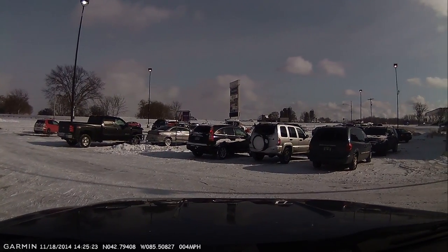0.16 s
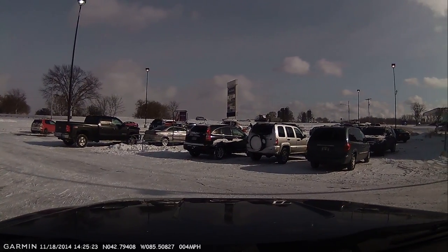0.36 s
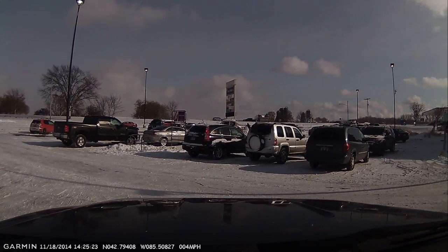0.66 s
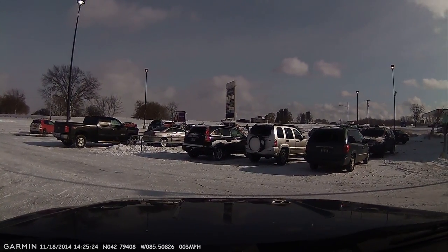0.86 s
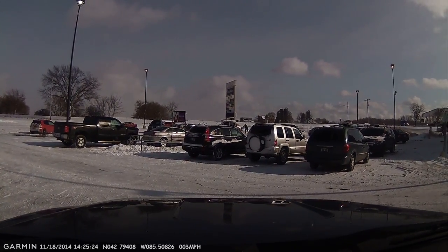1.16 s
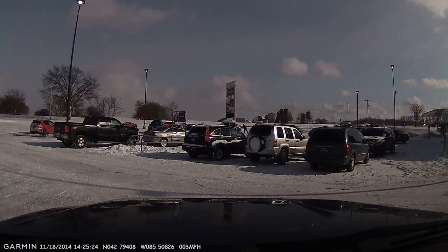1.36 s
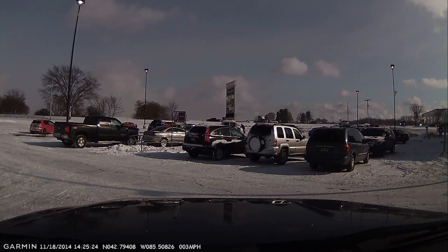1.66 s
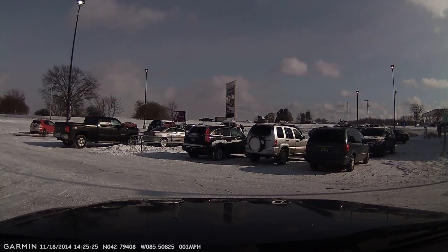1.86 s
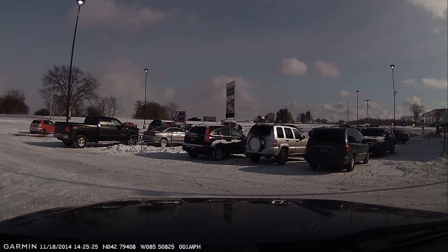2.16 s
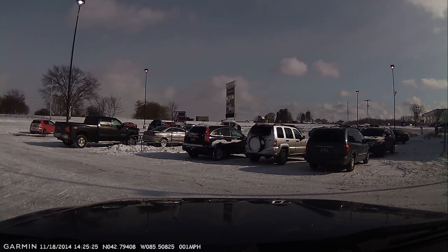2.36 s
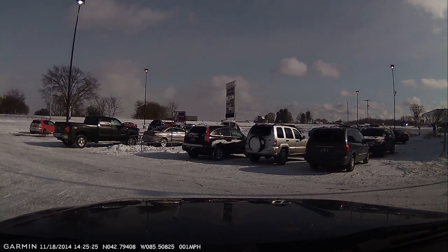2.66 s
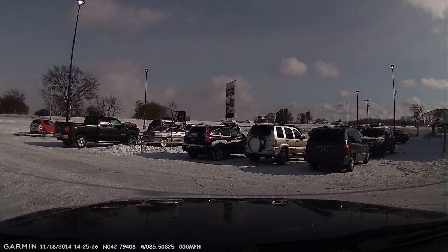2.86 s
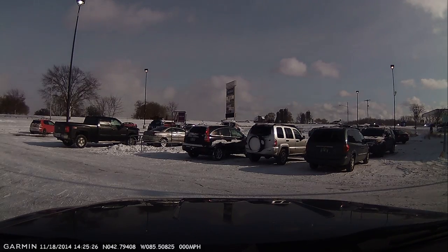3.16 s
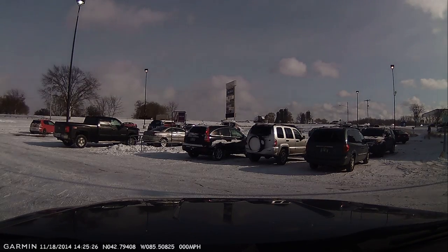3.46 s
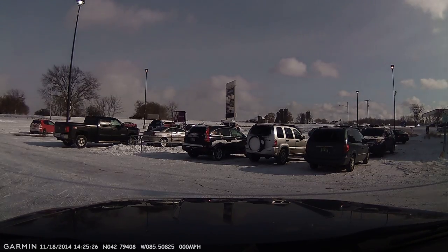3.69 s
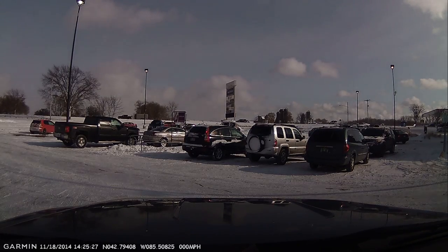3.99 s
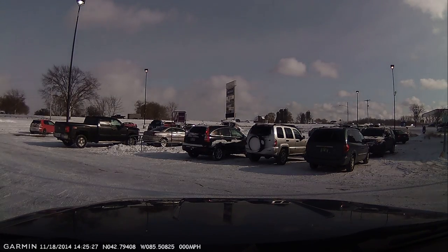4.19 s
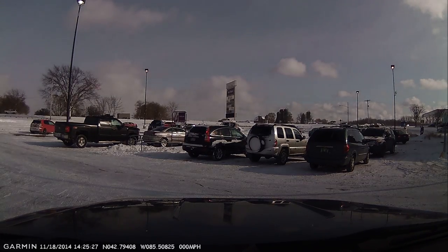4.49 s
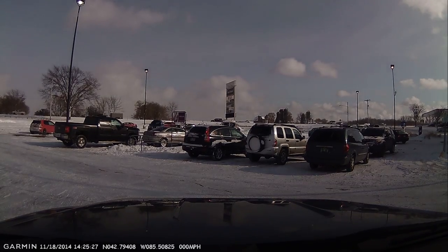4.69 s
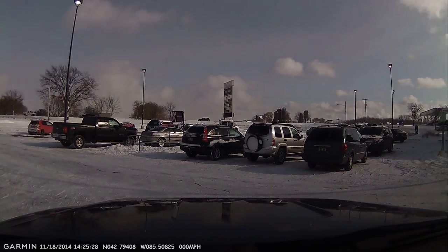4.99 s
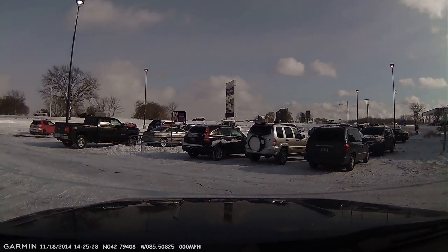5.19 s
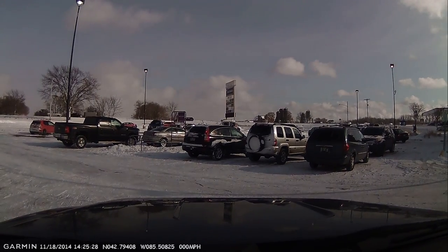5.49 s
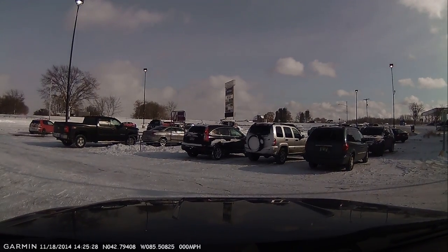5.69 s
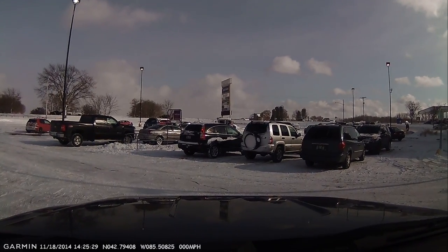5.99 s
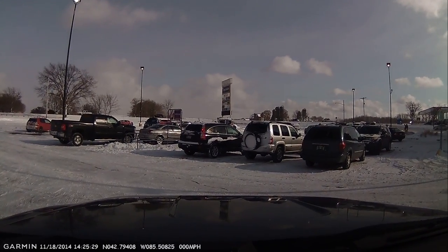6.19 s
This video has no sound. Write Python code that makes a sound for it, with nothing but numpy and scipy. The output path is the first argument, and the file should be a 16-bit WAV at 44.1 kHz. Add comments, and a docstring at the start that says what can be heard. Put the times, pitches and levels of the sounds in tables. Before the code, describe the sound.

Inside a slow car on packed snow, heard close at the windscreen: a low, uneven engine throb, a faint wavering pump whine, cabin drone, soft tyre rumble and thin hiss. A dull faint knock comes at 0.25 s. From 1.0 to 1.9 s there are grainy scuffs and a run of gear lever clunks; near 1.6 s the engine flares slightly, then gradually settles, and at 1.77 and 1.84 s deep boomy clunks carry sharp latch clicks and a short metallic buzz. Scuffs return at 2.3 to 2.75 s. Cloth rustles, the engine dips near 3 s, and the car stands by 3.3 s. Strong double knocks with plastic rattle land at 3.2 and 3.75 s, lighter ones between and at 4.1 s. Faint finger rubbing follows from 4.35 s, with bright button clicks at 4.91 to 5.14 s, a faint tap at 5.6 s and a last click at 5.97 s over a slightly quieter idle.

```python
"""Inside a car that rolls to a stop in a snowy lot and idles, heard from a camera on the windscreen.
At first: engine orders, a wavering pump whine, shaped noise for tyres, cabin and hiss, faint cloth noise,
and a knock on the dashboard made of ringing modes. From 1 s grainy scuffs, clunks of the gear lever, latch
clicks and a buzzing catch; the engine runs free and flares. The car stands at 3.3 s, amid more rustles and
modal knocks; from 4.3 s friction noise in case resonances is a rubbing finger, with button clicks around it."""
import sys
import numpy as np
from scipy import signal
from scipy.fft import rfft, irfft, next_fast_len
from scipy.io import wavfile

SR = 44100
rng = np.random.default_rng(int(sys.argv[2]) if len(sys.argv) > 2 else 0)


def generate_wav(signal):
    """Clip the signal to [-1, 1] and save it as 16-bit WAV at the path in sys.argv[1]."""
    frames = np.transpose(np.atleast_2d(signal))
    scaled = np.clip(frames, -1, 1) * 32767
    pcm = np.round(scaled).astype(np.int16)
    wavfile.write(sys.argv[1], SR, pcm)


N = 279594
TIME = np.arange(N) / SR
HIT_TIME = np.arange(SR // 3) / SR

# Partials of the engine note. Each row: multiple of the firing rate, relative level in dB.
ENGINE_ORDERS = [(1, -0.5), (1.75, -3.5), (2, -14), (3, -16), (4.75, -21)]
# The engine note swells and softens. Each row: centre in seconds, change in dB, half width in seconds.
ENGINE_SURGES = [(.25, 3, 0.13), (.85, -5, 0.25), (2.98, -11, 0.15)]
# Tyre spectrum. Each row: frequency in Hz, relative density in dB per Hz.
TYRE_SPECTRUM = [(5, -68), (18, 6.5), (33, 0), (48, -45), (100, -6), (400, -99)]
# The car rocks on its springs. Each row: peak in seconds, level in dB, half width in seconds.
SWAYS = [(.1, -49, 0.58), (.85, -39, 0.14), (1.8, -37, 0.18), (2.75, -50, 0.22), (3.9, -34.5, 0.11),
         (4.17, -31, 0.054)]
# Engine and fan through the cabin. Each row: frequency in Hz, relative density in dB per Hz.
CABIN_SPECTRUM = [(10, -7.5), (52, -5.5), (72, -0.5), (115, -8), (138, -9.5), (195, -14.5), (255, -16),
                  (420, -24), (540, -22.5), (720, -29.5), (1200, -38), (3000, -46.5), (16000, -78)]
# Microphone hiss. Each row: frequency in Hz, relative density in dB per Hz.
HISS_SPECTRUM = [(100, 13), (2000, 0), (6000, -1), (12000, -1), (16000, -1.5)]
# Strokes of a sleeve over the seat. Each row: peak in seconds, level in dB, half width in seconds,
# brightness in dB (added to the treble, taken from the rest), centre of the swish in Hz.
SLEEVE_STROKES = [(1.2, -63.5, 1, 0, 1490), (2.16, -54.5, 0.1, 7.5, 1840), (2.92, -61.5, 0.39, 3.5, 1410),
                  (3.12, -53.5, 0.35, 3.5, 1900), (3.56, -53.5, 0.12, 1, 1920),
                  (3.81, -46.5, 0.21, 2.5, 2050), (4.35, -58, 0.56, 5.5, 1800)]
# Cloth spectrum. Each row: frequency in Hz, relative density in dB per Hz.
CLOTH_SPECTRUM = [(200, 17), (700, 8), (1400, 3.5), (2200, -6), (3200, -1), (5000, -5), (8000, -10.5),
                  (12000, -8), (16000, -45)]
# Knocks on the dashboard, each landing twice. Each row: start in seconds, first contact in dB,
# second contact in dB, panel pitch factor, clatter level in dB, clatter brightness in dB per octave.
KNOCKS = [(.254, -46, -51, 0.95, -52, -14), (3.211, -26, -16, 1.0, -24.5, -1.83),
          (3.516, -39, -70, 1.35, -42, -1.5), (3.602, -35.5, -49, 0.84, -55, -8),
          (3.754, -18, -27, 1.29, -37.5, -0.6), (4.1102, -39.5, -52, 1.15, -40.5, -3.5),
          (5.583, -54, -67, 2.56, -51, -1.5)]
# Trim panel modes. Each row: frequency in Hz at pitch factor 1, relative level in dB, t60 in seconds.
PANEL_MODES = [(188.3, -14, 0.25), (253.5, -8.5, 0.14), (319, 1, 0.064), (404, 1.5, 0.059),
               (563, -11, 0.036), (912, -23.5, 0.096), (1508, -18.5, 0.056)]
# Modes of the car body and the air in it. Each row: frequency in Hz at pitch factor 1,
# relative level in dB, t60 in seconds.
BODY_MODES = [(64.6, -13, 0.71), (91.1, 0.5, 0.26), (134.5, -2, 0.076), (173, -20, 0.17)]
# Loose plastic before its tilt. Each row: frequency in Hz, relative density in dB per Hz.
CLATTER_SPECTRUM = [(60, -8.5), (250, 3.5), (550, 2), (750, -5.5), (1400, -7), (2200, -9.5), (2800, -9.5),
                    (4000, -14.5), (6500, -12.5), (9000, -18.5), (12500, -14), (16000, -47)]
# Short scuffs of things sliding. Each row: peak in seconds, level in dB, time to swell in seconds.
SCUFFS = [(1.044, -56, 0.0028), (1.585, -37.5, 0.0064), (2.33, -48.5, 0.0045), (2.581, -40, 0.0063),
          (2.714, -49.5, 0.0032), (2.743, -42.5, 0.0055), (3.575, -46.5, 0.0053), (4.093, -56, 0.0054)]
# Dry noise of a scuff. Each row: frequency in Hz, relative density in dB per Hz.
SCUFF_SPECTRUM = [(200, 17), (800, 3), (1350, -6), (2100, 1), (3100, 1), (4500, 5.5), (8000, 1.5),
                  (12500, 1.5), (16000, -39)]
# Resonances of the sliding thing. Each row: frequency in Hz, width in Hz, relative level in dB.
SCUFF_RESONANCES = [(1330, 420, 0.5), (3170, 420, -5), (6040, 170, -6.5), (9000, 260, -7)]
# Gear lever passing its notches. Each row: start in seconds, strength in dB, body boom in dB,
# contact time in seconds, clatter brightness in dB per octave.
CLUNKS = [(1.161, -31.5, -33.5, 0.0045, -3.5), (1.223, -33.5, -28.5, 0.0068, -3),
          (1.32, -51, -42, 0.0014, -1.5), (1.424, -39.5, -38, 0.004, -3.5),
          (1.44, -34, -34.5, 0.00081, -2.5), (1.556, -40.5, -40, 0.011, -0.5),
          (1.584, -31, -31.5, 0.0049, -2), (1.689, -36.5, -46, .0008, -3.5),
          (1.7708, -37, -16, 0.0025, -1.5), (1.835, -40, -21.5, 0.0022, 1.5), (1.878, -39, -31.5, .003, -5)]
# Sharp clicks of the gear lever's latch, then of the camera's buttons. Each row: start in seconds,
# ring level in dB, pitch in Hz that the contact favours, focus in dB lost per octave away from it,
# dry snap in dB, snap pitch in Hz.
CLICKS = [(1.4418, -59, 6000, 13, -35.5, 5100), (1.688, -41, 6000, 16, -40, 4600),
          (1.7707, -38.5, 6000, 4, -33, 3560), (1.8371, -39, 3500, 6, -40, 4500),
          (4.913, -17.5, 5200, 3.5, -33, 11800), (4.9362, -23.5, 2490, 7.5, -29, 10500),
          (4.9982, -35.5, 3200, 0.5, -30, 10700), (5.1369, -23, 1600, 21, -30, 1610),
          (5.9692, -18, 5900, 4, -29.5, 11800)]
# Modes of a small hard shell, shared by all clicks. Each row: frequency in Hz, relative level in dB,
# t60 in seconds.
SHELL_MODES = [(1710, -4, 0.006), (2930, 0, 0.018), (4110, -8, 0.01), (5250, -19, 0.024), (6340, 1, 0.0067),
               (7490, 2.5, 0.0051), (11670, -7, 0.0055), (12900, -16, 0.0034)]
# A sprung catch jangling after a knock. Each row: start in seconds, level in dB, t60 in seconds.
JANGLES = [(1.584, -46, .08), (1.77, -28.5, 0.16), (1.834, -35.5, 0.14), (1.877, -47, 0.5)]
# Resonances of the catch. Each row: frequency in Hz, width in Hz, relative level in dB.
CATCH_RESONANCES = [(388, 61, 16.5), (596, 16, 20), (1470, 50, -15), (2690, 280, 0.5), (6370, 130, -12)]
# Finger rubbing the case. Each row: peak in seconds, level in dB, half width in seconds.
RUBS = [(4.365, -64, .04), (4.48, -59.5, 0.15), (4.66, -69, 0.047), (5.21, -68.5, .04), (5.88, -66.5, .05)]
# Case resonances under the finger, lowest first. Each row: frequency in Hz, width in Hz, relative level in dB.
RUBBED_RESONANCES = [(3005, 160, 1.5), (6380, 220, -3), (7340, 230, 7), (11200, 320, -4)]

# firing rate: held down in gear, it flares when the load comes off and settles to idle
IN_GEAR_HZ, IDLE_HZ, FLARE_HZ = 36.6, 39.83, 4.4
UNLOAD_S, FLARE_RISE_S, SETTLE_S = 1.58, 0.2032, 1.7
ENGINE_DB = -46
DRONE_SAG_DB_PER_S, SAG_FROM_S = -1.14, 5.1  # engine and cabin grow quieter as the idle settles
# belt-driven pump: its whine rises and swells under one passing load
PUMP_HZ, PUMP_DB, LOAD_HZ, LOAD_DB = 200.7, -59.5, 9.2, 6
LOAD_S, LOAD_WIDTH_S = 1.2, 0.65
# the tyre rumble falls with the speed until the car stands
STOP_S, ROLL_DB, STANDING_DB = 3.3, -40.5, -55.5
SWISH_STRAY = 0.06  # rms share by which the pitch of the swish strays
BOUNCE_S = 0.0092  # wait for the second contact; shorter on a stiffer, higher panel
KNOCK_CONTACT_S, KNOCK_T60_S = 0.0027, 0.088
TOUCH_BOOM_DB, TOUCH_BOOM_PITCH, WEIGHT_BOOM_DB, WEIGHT_BOOM_PITCH = -8.5, 1.6, -6, 0.87
DASH_HZ, DASH_DB = 1290, -3.5  # the dashboard colours the clatter of the knocks
CONSOLE_HZ, CONSOLE_DB = 1810, -3.5  # the hollow console colours the lever's clatter
HOLLOW_Q = 1.52
SCUFF_FALL = 2.17  # a scuff dies this many times more slowly than it swells
CLUNK_PANEL_DB, CLUNK_PITCH, CLUNK_T60_S = -2, 0.95, 0.1
HEAVY_DB, HEAVY_PITCH, BOOM_OCTAVES_PER_DB = -16, 0.94, 0.03  # heavier blows boom lower
SNAP_HZ = 5000  # snaps below this pitch ring longer, those above it shorter
FIRM_DB = -60  # at this force the upper case resonances match the lowest
EDGE_HZ = 15900


def amp(db):
    """Amplitude factor of a level in dB."""
    return 10 ** (np.asarray(db) / 20)


def unit(x):
    """Scale to rms 1."""
    return x / np.sqrt(np.mean(x ** 2) + 1e-20)


def add(mix, s, sound):
    """Lay a sound into the mix from s seconds on."""
    part = mix[max(round(s * SR), 0):][:len(sound)]
    part += sound[:len(part)]


def noise(spectrum, size=N, tilt_db=0):
    """Noise of rms 1 with a given spectrum, tilted by some dB per octave."""
    octave = np.log2(np.fft.rfftfreq(size, 1 / SR) + 1)
    hz, db = np.transpose(spectrum)
    colour = amp(np.interp(octave, np.log2(hz), db) + tilt_db * octave)
    return unit(irfft(rfft(rng.standard_normal(size)) * colour, size))


def wander(hz, size=N):
    """Slow chance of rms 1 that changes about hz times a second."""
    step = 16  # drawn at every 16th sample
    count = next_fast_len(size // step + 2)
    f = np.fft.rfftfreq(count, step / SR)
    slow = unit(irfft(rfft(rng.standard_normal(count)) / (1 + (f / hz) ** 4), count))
    return np.interp(np.arange(size) / step, np.arange(count), slow)


def swell(s, width):
    """A smooth rise to 1 and fall around a moment."""
    return np.exp(-np.minimum(((TIME - s) / width) ** 2, 20))


def swells(rows):
    """Joint strength of several swells that overlap, added as powers."""
    return np.sqrt(sum((amp(db) * swell(s, width)) ** 2 for s, db, width in rows))


def onset(t, rise):
    """Smooth build-up of a contact force."""
    return 1 - np.exp(-(t / rise) ** 2)


def ring(modes, t, pitch=1):
    """Dying modes after a blow; neighbours swing in opposite directions."""
    out = 0
    for k, (hz, db, t60) in enumerate(modes):
        out = out + (-1) ** k * amp(db - 60 * t / t60) * np.sin(2 * np.pi * hz * pitch * t)
    return out


def resonate(x, hz, width):
    """A resonance of gain 1 whose centre may move."""
    turn = np.exp(2j * np.pi * np.cumsum(hz * np.ones(N)) / SR)
    r = np.exp(-np.pi * width / SR)
    # shift the centre to 0 Hz, smooth there, shift back
    return 2 * (turn * signal.lfilter([1 - r], [1, -r], x / turn)).real


def sing(resonances):
    """Friction noise of rms 1 heard through an object's resonances."""
    return unit(sum(amp(db) * resonate(rng.standard_normal(N), hz, width) for hz, width, db in resonances))


def sag_db():
    """The drone eases off as the idle settles."""
    return DRONE_SAG_DB_PER_S * np.maximum(TIME - SAG_FROM_S, 0)


def engine(uneven_db=3.0, drift=0.016):
    """Low orders of the firing rate, each a little unsteady."""
    free = np.maximum(TIME - UNLOAD_S, 0)
    gain_hz = IDLE_HZ - IN_GEAR_HZ + FLARE_HZ * np.exp(-free / SETTLE_S)
    hz = IN_GEAR_HZ + onset(free, FLARE_RISE_S) * gain_hz
    db = ENGINE_DB + sum(change_db * swell(s, width) for s, change_db, width in ENGINE_SURGES) + sag_db()
    turns = np.cumsum(hz * (1 + drift * wander(5.05))) / SR
    note = np.zeros(N)
    for k, level in ENGINE_ORDERS:
        strength = np.sqrt(2) * amp(level + uneven_db * wander(5.1))
        note += strength * np.sin(2 * np.pi * (k * turns + rng.random()))
    return amp(db) * note


def pump(uneven_db=3, drift=0.01965):
    """One wavering line that rises with the load."""
    load = swell(LOAD_S, LOAD_WIDTH_S)
    turns = np.cumsum((PUMP_HZ + LOAD_HZ * load) * (1 + drift * wander(11.14))) / SR
    level = amp(PUMP_DB + LOAD_DB * load + uneven_db * wander(4.1))
    return level * np.sqrt(2) * np.sin(2 * np.pi * turns)


def tyres():
    """Rumble on packed snow that falls with the speed, stirred by the rocking car."""
    speed = np.maximum(1 - TIME / STOP_S, 0)
    strength = np.sqrt((amp(ROLL_DB) * speed) ** 2 + amp(STANDING_DB) ** 2 + swells(SWAYS) ** 2)
    return strength * noise(TYRE_SPECTRUM)


def cabin(level_db=-45.0, swell_db=1):
    """Gently swelling drone of engine and fan, filtered by the cabin."""
    return amp(level_db + sag_db() + swell_db * wander(3.8)) * noise(CABIN_SPECTRUM)


def hiss(level_db=-60.0):
    """Steady microphone hiss."""
    return amp(level_db) * noise(HISS_SPECTRUM)


def rustle(grain_db=2, swish_db=-5, swish_width_hz=950, patchy_db=2.0, fibres_db=-1):
    """Cloth catches and slides; each stroke has its own brightness and swish."""
    fibres = amp(fibres_db) * noise(CLOTH_SPECTRUM)
    dull = signal.sosfilt(signal.butter(1, 3500, fs=SR, output="sos"), fibres)
    peak_s, *_, stroke_hz = np.transpose(SLEEVE_STROKES)
    # the sliding speed is unsteady
    centre_hz = np.interp(TIME, peak_s, stroke_hz) * (1 + SWISH_STRAY * wander(16))
    once = resonate(rng.standard_normal(N), centre_hz, swish_width_hz)
    swish = unit(resonate(once, centre_hz, swish_width_hz))
    body = dull + amp(swish_db + patchy_db * wander(16)) * swish
    low = swells([(s, db - bright_db, width) for s, db, width, bright_db, _ in SLEEVE_STROKES])
    high = swells([(s, db + bright_db, width) for s, db, width, bright_db, _ in SLEEVE_STROKES])
    return amp(grain_db * wander(39)) * (low * body + high * (fibres - dull))


def panel(pitch, rise=0.00043):
    """A struck trim panel rings."""
    return ring(PANEL_MODES, HIT_TIME, pitch) * onset(HIT_TIME, rise)


def boom(pitch, rise=0.0034):
    """The body and its air answer a blow slowly."""
    return ring(BODY_MODES, HIT_TIME, pitch) * onset(HIT_TIME, rise)


def clatter(rise, t60, tilt_db, grain_db=3.5, split_hz=2300, low_lag=0.0047, treble_life=0.68):
    """Loose plastic shaken by a blow; its parts touch unevenly."""
    t = HIT_TIME
    grain = amp(grain_db * wander(160, size=len(t)))
    loose = noise(CLATTER_SPECTRUM, size=len(t), tilt_db=tilt_db) * grain
    dull = signal.sosfiltfilt(signal.butter(2, split_hz, fs=SR, output="sos"), loose)
    # the treble arrives first and the upholstery soaks it up first
    lows = dull * onset(t, rise + low_lag) * amp(-60 * (t - rise - low_lag) / t60)
    highs = (loose - dull) * onset(t, rise) * amp(-60 * (t - rise) / (t60 * treble_life))
    return lows + highs


def hollow(x, hz, db):
    """A plastic shell adds one broad resonance."""
    return x + amp(db) * signal.lfilter(*signal.iirpeak(hz, HOLLOW_Q, fs=SR), x)


def knocks():
    """A first touch shakes loose plastic, then the weight lands with a softer onset and deeper boom."""
    out = np.zeros(N)
    for s, first_db, second_db, pitch, clatter_db, tilt_db in KNOCKS:
        touch = panel(pitch) + amp(TOUCH_BOOM_DB) * boom(TOUCH_BOOM_PITCH, rise=0.002)
        weight = panel(pitch, rise=0.00079) + amp(WEIGHT_BOOM_DB) * boom(WEIGHT_BOOM_PITCH)
        rattle = hollow(clatter(KNOCK_CONTACT_S, KNOCK_T60_S, tilt_db), DASH_HZ, DASH_DB)
        add(out, s, amp(first_db) * touch + amp(clatter_db) * rattle)
        add(out, s + BOUNCE_S / pitch, amp(second_db) * weight)
    return out


def scuffs(grain_db=3, dry_db=-2, ring_db=-4):
    """Brief grainy slides that swell and die."""
    stroke = np.zeros(N)
    for s, db, rise in SCUFFS:
        stroke += amp(db) * np.exp(-np.maximum(s - TIME, (TIME - s) / SCUFF_FALL) / rise)
    friction = amp(dry_db) * noise(SCUFF_SPECTRUM) + amp(ring_db) * sing(SCUFF_RESONANCES)
    return stroke * amp(grain_db * wander(190)) * friction


def lever(drag=5):
    """Each notch rings the console and booms in the body; a slower contact clatters longer."""
    out = np.zeros(N)
    for s, db, boom_db, contact, tilt_db in CLUNKS:
        rattle = clatter(contact, CLUNK_T60_S + drag * contact, tilt_db)
        console = amp(CLUNK_PANEL_DB) * panel(CLUNK_PITCH) + hollow(rattle, CONSOLE_HZ, CONSOLE_DB)
        boom_pitch = HEAVY_PITCH * 2 ** (BOOM_OCTAVES_PER_DB * (HEAVY_DB - boom_db))
        add(out, s, amp(db) * console + amp(boom_db) * boom(boom_pitch))
    return out


def clicks(rise=0.00023, snap_t60=0.0072, snap_skirt_db=-22, lowest_hz=700):
    """A latch or button snaps and rings a small shell, most strongly near the pitch the contact favours."""
    out = np.zeros(N)
    t = np.arange(SR // 16) / SR
    for s, db, centre_hz, focus_db, snap_db, snap_hz in CLICKS:
        modes = [(hz, level - focus_db * abs(np.log2(hz / centre_hz)), t60) for hz, level, t60 in SHELL_MODES]
        colour = [(snap_hz / 10, snap_skirt_db * 2), (snap_hz / 2, snap_skirt_db / 2), (snap_hz, 0),
                  (snap_hz * 2, snap_skirt_db), (snap_hz * 10, snap_skirt_db * 2)]
        decay_s = snap_t60 * np.sqrt(SNAP_HZ / snap_hz)
        snap = amp(snap_db - 60 * t / decay_s) * noise(colour, size=len(t))
        add(out, s, amp(db) * ring(modes, t) * onset(t, rise) + snap)
    # so small a part radiates no bass
    return signal.sosfilt(signal.butter(2, lowest_hz, "high", fs=SR, output="sos"), out)


def catch(rise=0.0012):
    """The catch buzzes in its seat and settles."""
    shake = np.zeros(N)
    t = np.arange(SR // 2) / SR
    for s, db, t60 in JANGLES:
        add(shake, s, amp(db - 60 * t / t60) * onset(t, rise))
    return shake * sing(CATCH_RESONANCES)


def finger(grain_db=2):
    """Skin friction sings faintly in the resonances of the case, brighter as it presses harder."""
    force = swells(RUBS)
    upper = force / amp(FIRM_DB)
    friction = sing(RUBBED_RESONANCES[:1]) + upper * sing(RUBBED_RESONANCES[1:])
    return force * amp(grain_db * wander(60)) * friction


def scene():
    """Everything heard in the cabin, at one microphone."""
    drone = engine() + pump() + tyres() + cabin() + hiss()
    handling = rustle() + knocks() + scuffs() + lever() + clicks() + catch() + finger()
    return (drone + handling)[None]


def record(dry):
    """The camera's band limit."""
    lowpass = signal.firwin(511, EDGE_HZ, window=("kaiser", 9), fs=SR)
    return signal.oaconvolve(dry, lowpass[None], "same")


dry = scene()
out = record(dry)
generate_wav(out)
```